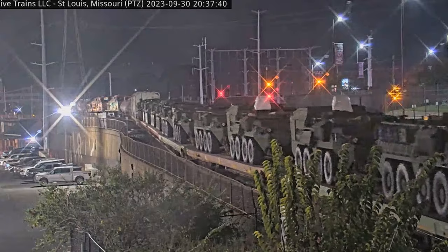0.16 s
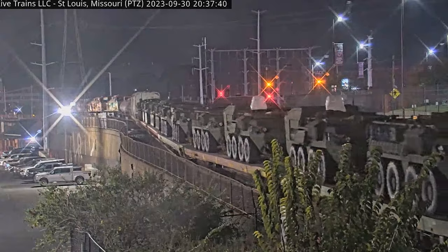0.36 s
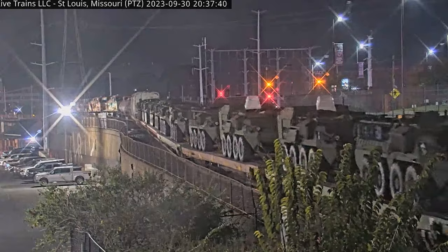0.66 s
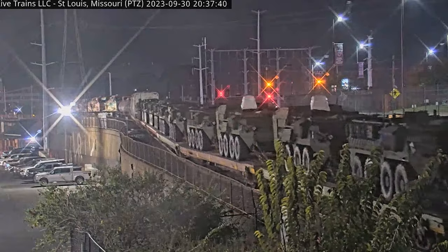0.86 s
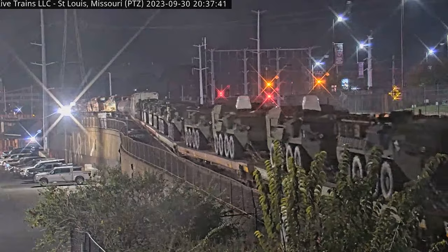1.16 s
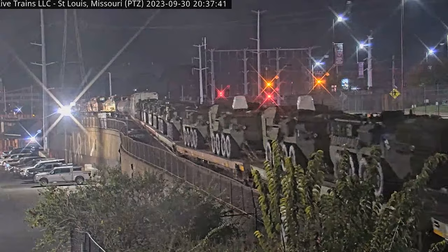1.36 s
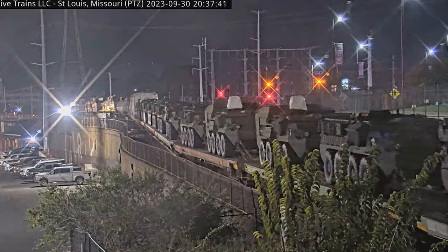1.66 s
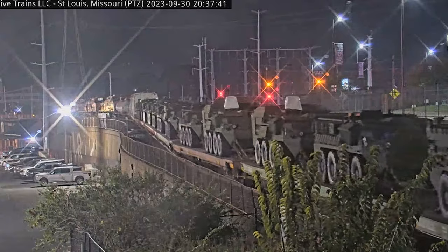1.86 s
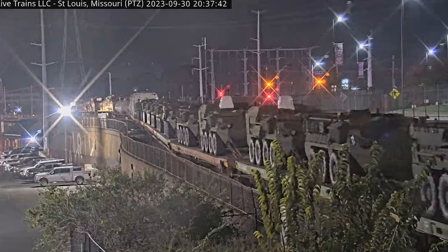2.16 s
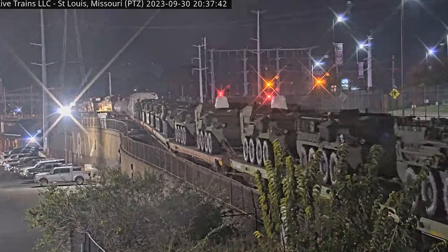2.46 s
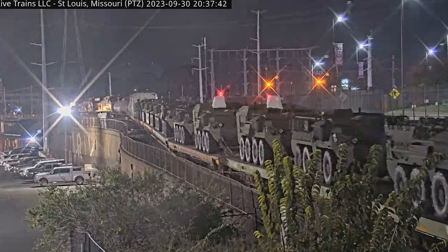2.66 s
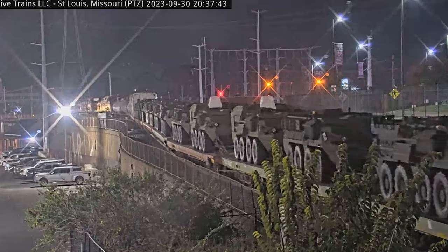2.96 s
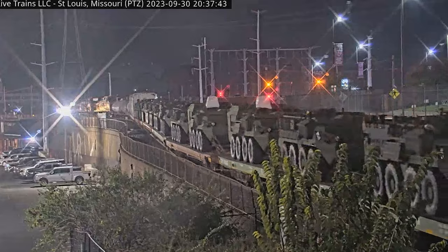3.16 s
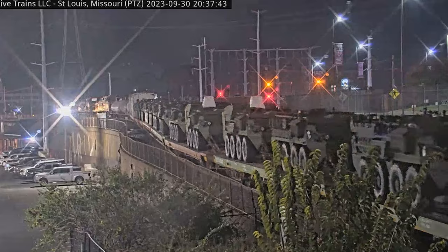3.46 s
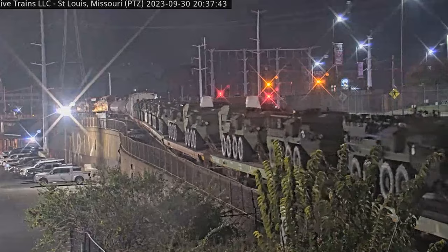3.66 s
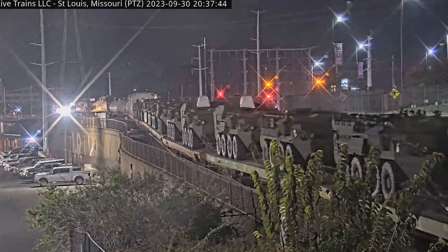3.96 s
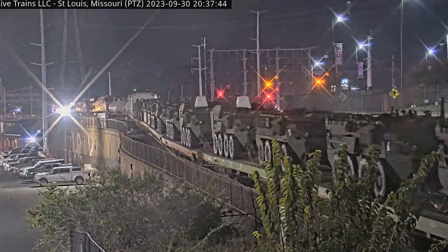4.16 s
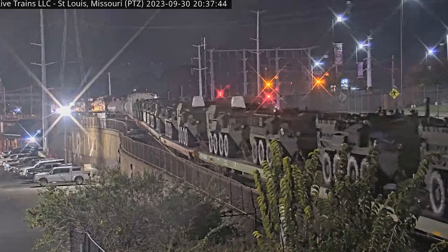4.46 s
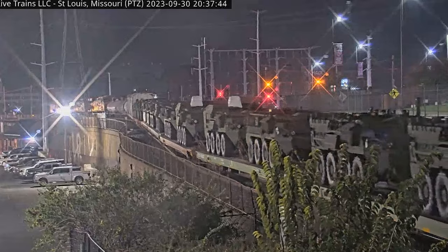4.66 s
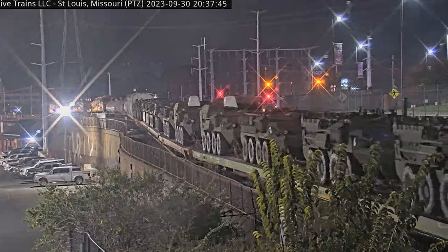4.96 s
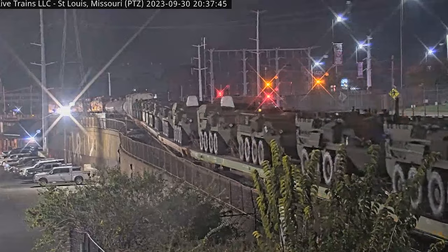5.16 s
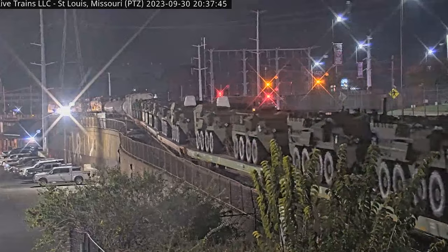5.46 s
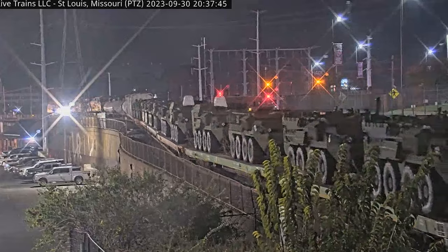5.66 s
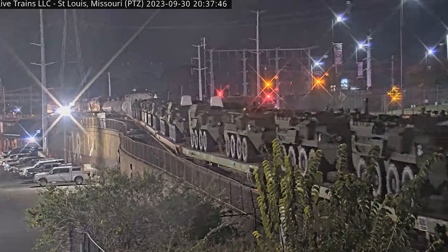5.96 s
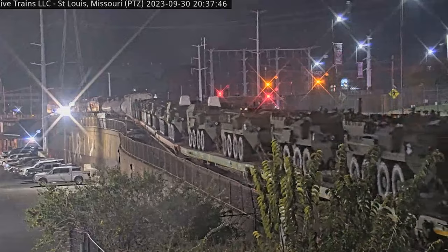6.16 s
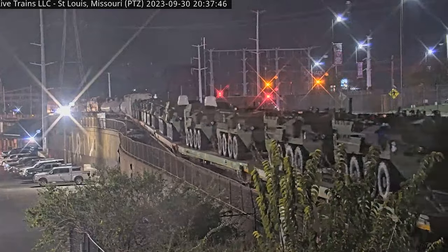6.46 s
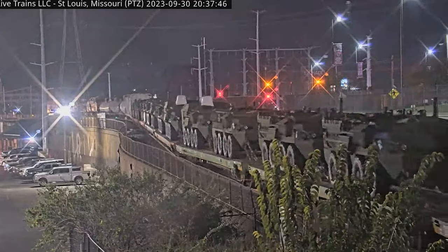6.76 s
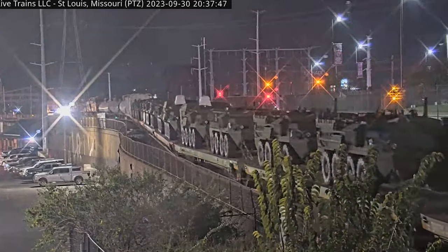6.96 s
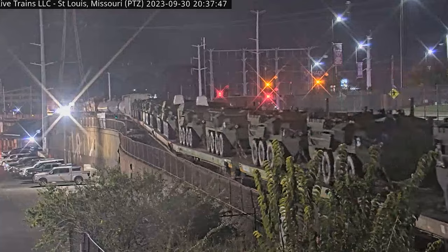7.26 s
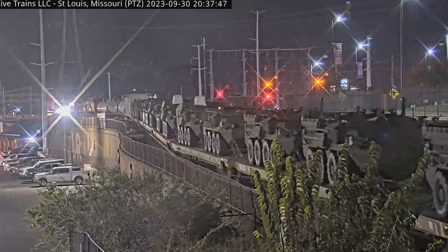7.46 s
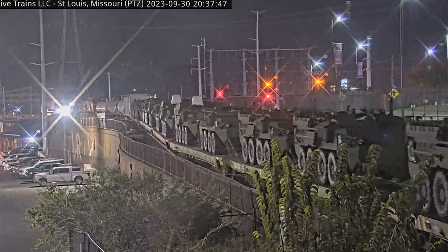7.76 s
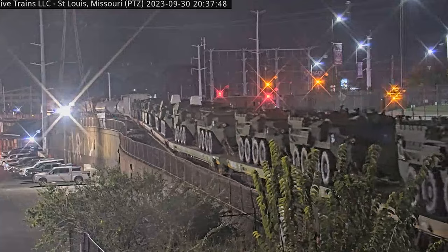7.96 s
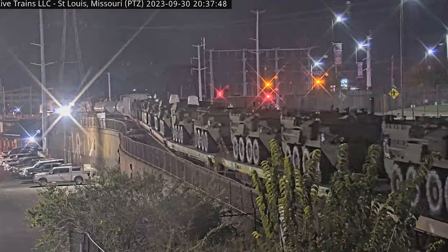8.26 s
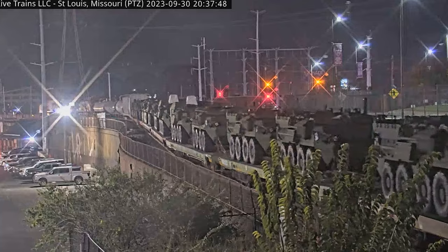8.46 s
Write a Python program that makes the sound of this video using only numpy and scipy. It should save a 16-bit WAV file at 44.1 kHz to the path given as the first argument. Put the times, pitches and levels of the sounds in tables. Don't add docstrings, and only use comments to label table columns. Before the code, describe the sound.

Outdoors at night, a heavy freight train creeps round a tight curve. Its wheels shriek against the rail in a rough, many-pitched metallic squeal, loudest at the start, with brief pure whistling tones. A second wheel set takes over midway with a slightly different screech, then fades. Flanges hiss, wagons rumble low and clatter, and dull coupler knocks become more frequent later. One distant outdoor microphone, identical in both channels, with faint hiss.

```python
import sys
import numpy as np
from scipy import signal
from scipy.io import wavfile
from scipy.ndimage import uniform_filter1d, map_coordinates

SR = 44100
rng = np.random.default_rng(int(sys.argv[2]) if len(sys.argv) > 2 else 0)


def ratio(d):
    e = np.asarray(d, float) / 20
    return 10 ** e


def master_out(mix):
    frames = np.transpose(np.atleast_2d(mix))
    ceiling = np.clip(frames, -1, 1)
    pcm = np.round(ceiling * 32767).astype(np.int16)
    wavfile.write(sys.argv[1], SR, pcm)


N = 380122
STEP = 128

# (t/s, level/dB)
SLIP = [(0, -20), (.38, -22), (1.8, -25.5), (1.94, -26), (2.04, -25), (2.54, -28), (2.76, -25),
        (3.29, -27.5), (3.65, -26.5), (3.96, -29.5), (4.54, -31), (5.88, -29), (6, -25.5), (6.14, -29),
        (7.3, -29.5), (7.5, -32.5), (8.05, -40.5), (8.62, -47.5)]
# (start t/s, length t/s, f/Hz, rms level/dB)
SINGS = [(0.247, 0.113, 2774, -30.9), (0.386, 0.087, 2768, -30.6), (0.415, 0.041, 7216, -34.0),
         (0.522, 0.064, 7230, -37.1), (0.653, 0.049, 10902, -49.0), (0.958, 0.061, 6288, -28.2),
         (1.086, 0.052, 9060, -46.1), (1.373, 0.041, 5336, -29.5), (1.556, 0.064, 6272, -30.5),
         (2.04, 0.052, 5554, -31.2), (2.299, 0.064, 2761, -40.5), (2.723, 0.058, 7166, -44.4),
         (3.042, 0.061, 2758, -40.9), (3.439, 0.041, 3534, -43.8), (3.463, 0.049, 4422, -35.7),
         (4.348, 0.049, 6284, -36.5), (4.952, 0.046, 8113, -51.7), (5.039, 0.049, 7160, -45.4),
         (5.236, 0.081, 7150, -44.5), (6.708, 0.046, 9056, -54.1), (6.882, 0.055, 4438, -36.2),
         (6.893, 0.081, 8077, -50.8), (7.015, 0.07, 4436, -32.8), (7.329, 0.038, 5400, -35.7)]


def evened(x):
    return x / np.sqrt(np.mean(x ** 2) + 1e-20)


def curve(rows, axis=1):
    rows = np.array(rows)
    return np.interp(np.arange(N) / SR, rows[:, 0], rows[:, axis])


def drift(slow_hz, fast_hz):
    hz = np.geomspace(slow_hz, fast_hz, 30)[:, None]
    t = np.arange(0, N + STEP, STEP) / SR
    waves = np.sin(2 * np.pi * (hz * t + rng.random(hz.shape)))
    return evened(waves.sum(0))


def smooth_gain(control_db):
    return np.interp(np.arange(N), np.arange(len(control_db)) * STEP, ratio(control_db))


def ring(x, hz, width):
    r = np.exp(-np.pi * width / SR)
    w = 2 * np.pi * hz / SR
    edge_gain = (1 - r * r) / 2
    return signal.lfilter([edge_gain, 0, -edge_gain], [1, -2 * r * np.cos(w), r * r], x)


def coloured(points, patchy_db, bright_db=0., strands_db=0.):
    frames, hz = N // 256 + 5, np.fft.rfftfreq(1024, 1 / SR)
    a, b, patches, strands = rng.standard_normal((frames, 513, 4)).T
    strands = uniform_filter1d(strands, size=60, axis=1)
    strands = evened(uniform_filter1d(strands, size=40, axis=1))
    patches = uniform_filter1d(patches, size=10, axis=0)
    patches = evened(uniform_filter1d(patches, size=12, axis=1))

    f, level_db = np.transpose(points)
    shape_db = np.interp(np.log(hz + 1), np.log(f + 1), level_db, left=-90, right=-90)[:, None]
    lift_db = np.clip((hz[:, None] - 8000) / 2500, 0, 1) * bright_db
    gain = ratio(shape_db + patchy_db * patches + strands_db * strands + lift_db)
    noise = signal.istft((a + 1j * b) * gain, nperseg=1024, noverlap=768)[1]
    return evened(noise[:N])


def wheel(pitches, modes, locks, flutter_db, wander_db, skirt_hz):
    t, out = np.arange(0, N + STEP, STEP) / SR, np.zeros(N)
    table_hz = np.array(pitches)
    for k, (hz, (width, db)) in enumerate(zip(pitches, modes)):
        drive_db = db + flutter_db * drift(5, 70) + wander_db * drift(0.488, 4)
        for start, length, lock_hz, extra_db in locks:
            if np.argmin(abs(table_hz - lock_hz)) == k:
                inside = np.minimum(t - start, start + length - t)
                drive_db += extra_db * np.clip(inside / (.05 + .15 * length) + .5, 0, 1)
        for start, length, sing_hz, _ in SINGS:
            if abs(sing_hz - hz) < 60:
                drive_db -= 7 * ((t > start - .02) & (t < start + length - .005))
        friction = smooth_gain(drive_db) * rng.standard_normal(N)
        slips = ring(friction, hz, width + skirt_hz)
        out += ring(slips, hz, width)
    usual_rms = np.sqrt(sum(ratio(2 * db) * width * np.pi / SR for width, db in modes))
    return out / usual_rms


def receding(x):
    lead_share = .0012
    sag_per_s = .0013
    t = np.arange(N) / SR
    heard_s = t + lead_share * t - .5 * sag_per_s * t ** 2
    return map_coordinates(x, [SR * heard_s], order=3, mode="nearest")


def singing():
    out = np.zeros(N)
    for s, length, hz, db in SINGS:
        t = np.arange(round((length + .02) * SR)) / SR
        waver = .5 * np.sin(2 * np.pi * (12 * t + rng.random()))
        flutter_db = 2.5 * np.sin(2 * np.pi * (rng.uniform(25, 45) * t + rng.random()))
        tone = np.sqrt(2) * np.sin(2 * np.pi * hz * t + waver)
        soft_ends = signal.windows.tukey(len(t), .6)
        part = out[round((s - .01) * SR):][:len(t)]
        part += ratio(db + 1.5 + flutter_db) * tone * soft_ends
    return out


def squeal():
    first_hz = [1810, 2225, 2773, 3270, 3528, 3900, 4455, 4560, 5180, 5357, 5560, 5950, 6285, 7215, 7330,
                8125, 8230, 9070, 9975, 10895, 11680]
    # (width f/Hz, level/dB)
    first_modes = [(63, -21.5), (78.704, -24.5), (27.2, -4), (60, -19.5), (45.8, -11.5), (140, -16.5),
                   (57.4, -4), (111.11, -10), (83.333, -9), (51.4, 2.5), (136, -3), (200, -11.5),
                   (51.3, 0.5), (65, -12), (150, -34), (55, -16.5), (129.6, -20), (59, -17), (70, -33),
                   (90, -35.5), (170, -36.5)]
    # (start t/s, length t/s, f/Hz, extra level/dB)
    first_locks = [(0, .22, 2770, -3), (.46, .24, 2770, 4), (1.3, .4, 2770, 2), (3.3, 1.6, 2770, -3),
                   (1.7, .35, 2770, -3), (2.15, .4, 2770, 1.5), (2.7, 2.9, 2770, -3), (0, .35, 5350, 5),
                   (.7, .3, 5350, 3), (0, .6, 8120, 8), (.6, .4, 8120, 3), (1.25, .55, 8120, 8),
                   (.25, .75, 7210, 6), (3.45, .6, 7210, 6), (.7, .7, 6280, 4), (1.75, .45, 6280, -3),
                   (0, .2, 6280, -5), (.7, .55, 9070, 4), (2.45, .3, 9070, 5), (3.72, 1.25, 9070, 5),
                   (.25, 3.5, 10900, 11), (.5, 2.25, 10900, 5), (.2, .8, 3530, 4), (1.5, .9, 4450, -2),
                   (3.3, .7, 4450, 3), (2.55, 1.3, 1810, 4), (3.3, .6, 2230, 5), (2.3, .6, 11700, 4),
                   (0, 1.9, 1810, 3), (0, .8, 4450, 2)]
    second_hz = [960, 1780, 2200, 2565, 2690, 3270, 3535, 3825, 4460, 4540, 5290, 5410, 5580, 5910, 6210,
                 6370, 7150, 7330, 8085, 8260, 9045, 9930, 10900, 11800]
    # (width f/Hz, level/dB)
    second_modes = [(45, -20), (110, -16), (31, -9.5), (90, -12), (130, -7), (32.407, -10), (78.704, -6.5),
                    (65, -7.5), (45.3, 3.5), (101.85, -11), (96, 3), (110, 2), (200, 0), (120, -20),
                    (55, 2), (160, -1.5), (50, -1.5), (150, -11), (64, -15.5), (170, -17.5), (64.815, -21),
                    (70, -51), (220, -36), (90, -29)]
    # (start t/s, length t/s, f/Hz, extra level/dB)
    second_locks = [(6.2, 1.2, 4450, 3), (6.7, .5, 4450, 3), (6.2, .95, 8090, 4), (6.25, 1.1, 9040, 4),
                    (5, .6, 7150, 3), (5.9, .4, 2200, 4), (7.6, 1.1, 3540, 3), (6, .1, 960, 3),
                    (7.05, .12, 960, 4), (5.9, .3, 1750, 5), (8.2, .6, 4450, -4), (7.5, 1.2, 8090, -6),
                    (7.7, 1, 7150, -6), (7.7, 1, 6210, -4), (7.6, 1.1, 9040, -4), (7.6, 1.1, 2200, 4),
                    (7.4, 1.3, 1750, 3), (4.9, .3, 5410, 2), (5.55, .35, 4450, 3)]
    # (start t/s, end t/s)
    handover = (4.3, 6.42)

    first_db, second_db = -0.24, -0.08
    progress = (np.arange(N) / SR - handover[0]) / (handover[1] - handover[0])
    turn = np.clip(progress, 0, 1) * np.pi / 2
    first = receding(wheel(first_hz, first_modes, first_locks, 0.67, 1.0, 440))
    second = wheel(second_hz, second_modes, second_locks, 0.81, 0.99, 350)
    ringing = ratio(first_db) * np.cos(turn) * first + ratio(second_db) * np.sin(turn) * second
    return ratio(curve(SLIP)) * ringing + singing()


def scrape():
    # (f/Hz, level/dB per Hz)
    scrape_colour = [(600, -35), (1200, -20), (1700, -11.5), (2500, -9), (3100, -8), (4200, -7.5),
                     (4800, -1.5), (6000, 1), (6800, -7.5), (7700, -11), (8600, -23), (10400, -26),
                     (12200, -31), (15000, -44)]
    # (arrival t/s, lift level/dB, dulling dB/s)
    brightness = [
        (0, 4, .5),
        (5, 6, 2),
    ]

    scrape_db, follows, slip_mean_db = -34.5, 0.7, -27.5
    t = np.arange(N // 256 + 5) * 256 / SR
    bright_db = np.zeros(len(t))
    for s, lift_db, dull_db in brightness:
        bright_db = np.where(t >= s, lift_db - dull_db * (t - s), bright_db)
    hiss = coloured(scrape_colour, 1.2, bright_db, strands_db=3.3)
    level_db = scrape_db + follows * (curve(SLIP) - slip_mean_db)
    judder = smooth_gain(0.62 * drift(4, 60))
    return ratio(level_db) * judder * hiss


def rumble():
    # (f/Hz, level/dB per Hz)
    roar_colour = [(8.8, -32), (15, -3), (55, 4), (112, -8), (170, -14.5), (220, -43), (370, -120)]
    # (f/Hz, level/dB per Hz)
    clatter_colour = [(82, -25), (140, -0.5), (225, -5.5), (356, -5.5), (583, -12), (912, -11),
                      (1170, -18.5), (1300, -14), (1690, -26), (2860, -120)]
    # (t/s, extra level/dB)
    roar_swells = [
        (0.02, 5),
        (.42, 3.5),
        (1.41, 4.5),
        (3.31, 2),
        (3.53, 3),
        (5.06, 3.5),
        (5.45, 4.5),
        (6.58, 2),
        (7.5, 1),
    ]

    roar_db, roar_recedes = -40.5, 0.31
    clatter_db, clatter_recedes = -47.5, 0.55
    t = np.arange(N) / SR
    away_db = -20 * np.log10(1 + t / 3.17)
    swell_db = sum(db * np.exp(-.5 * ((t - s) / 0.031) ** 2) for s, db in roar_swells)
    roar = smooth_gain(0.46 * drift(1.3, 8.3)) * coloured(roar_colour, 1.0)
    roar = ratio(roar_db + roar_recedes * away_db + swell_db) * roar
    clatter = smooth_gain(0.49 * drift(3, 30)) * coloured(clatter_colour, 0.8, strands_db=2.0)
    return roar + ratio(clatter_db + clatter_recedes * away_db) * clatter


def knocks():
    # (t/s, peak level/dB, body f/Hz, time to fall 60 dB t/s)
    blows = [(0.211, -42.5, 339, 0.53), (0.511, -50, 331, 0.26), (2.573, -42.5, 1050, 0.18),
             (4.144, -52, 261, 0.25), (4.617, -48, 390, 0.23), (4.916, -43, 373, 0.12),
             (5.332, -45, 390, 0.15), (5.532, -45.5, 536, 0.18), (5.596, -41.5, 310, 0.15),
             (5.961, -44.5, 340, 0.33), (6.328, -37, 249, 0.098), (6.349, -46, 327, 0.3),
             (6.457, -45, 309, 0.25), (6.6, -43.5, 324, 0.19), (6.961, -44.5, 302, 0.38),
             (7.734, -43, 322, 0.14), (8.369, -45, 265, 0.33)]

    out, t = np.zeros(N), np.arange(SR // 2) / SR
    for s, peak_db, hz, t60 in blows:
        soft_start = np.minimum(t / .01, 1)
        burst = rng.standard_normal(len(t)) * ratio(-60 * t / t60) * soft_start
        body = evened(ring(ring(burst, hz, 97), hz, 300))
        clack = evened(ring(burst, 620, 700))
        thud = evened(ring(ring(burst, 220, 310), 240, 650))
        blow = body + 0.66 * clack + 0.54 * thud
        part = out[round(s * SR):][:len(t)]
        part += (ratio(peak_db + 4.5) * blow / abs(blow).max())[:len(part)]
    return out


def night_hiss():
    # (f/Hz, level/dB per Hz)
    hiss_colour = [(1500, -30), (3000, 5), (9000, -24), (13500, -20), (15100, -26)]
    return ratio(-55.5) * coloured(hiss_colour, .6)


def scene():
    mono = squeal() + scrape() + rumble() + knocks() + night_hiss()
    return np.tile(mono, (2, 1))


def roll_off(x):
    return signal.sosfilt(signal.butter(12, 15310, fs=SR, output="sos"), x)


def record(dry):
    # (f/Hz, width f/Hz, depth 0-1)
    notch = (12990, 1000, .96)
    hz, width, depth = notch
    notched = dry - depth * ring(dry, hz, width)
    treble_cut = signal.firwin(151, 14850, window=("kaiser", 9), fs=SR)
    finished = signal.oaconvolve(notched, treble_cut[None], "same")
    return roll_off(finished)


dry = scene()
out = record(dry)
master_out(out)
```